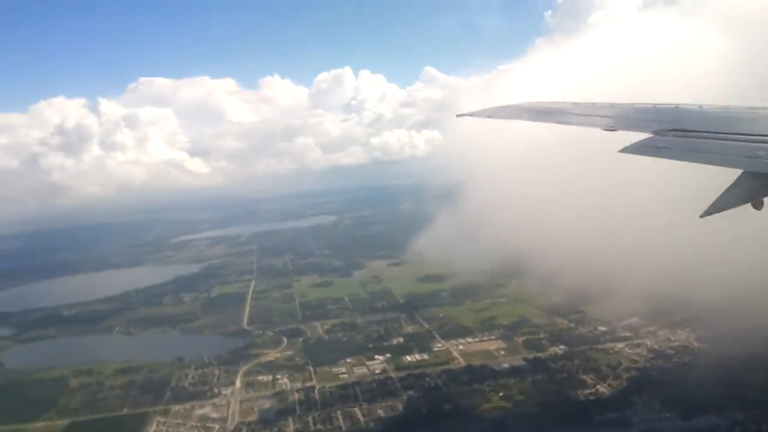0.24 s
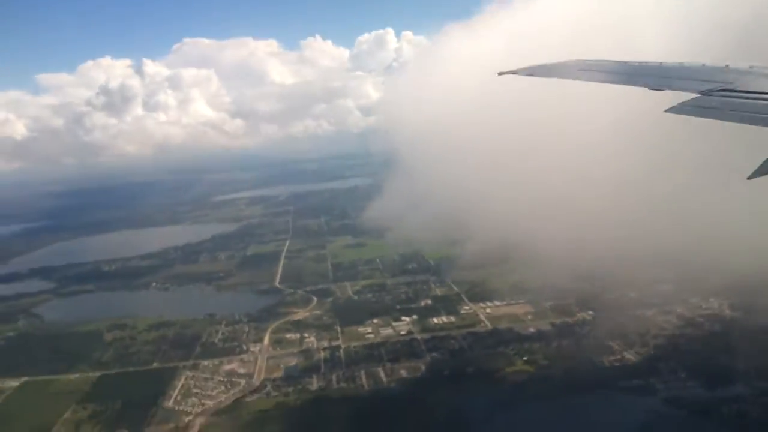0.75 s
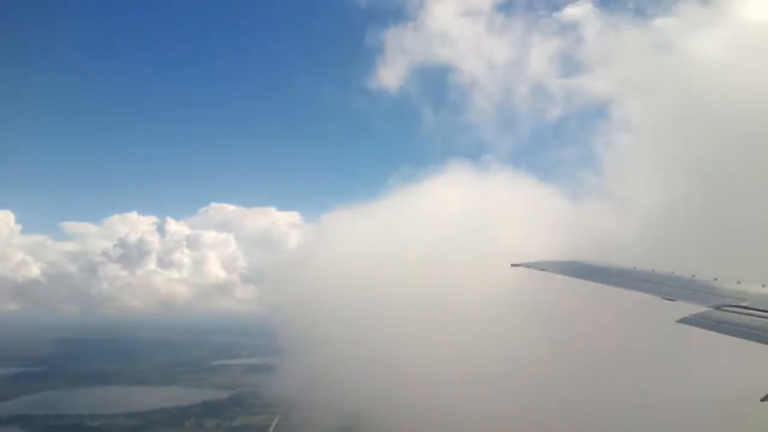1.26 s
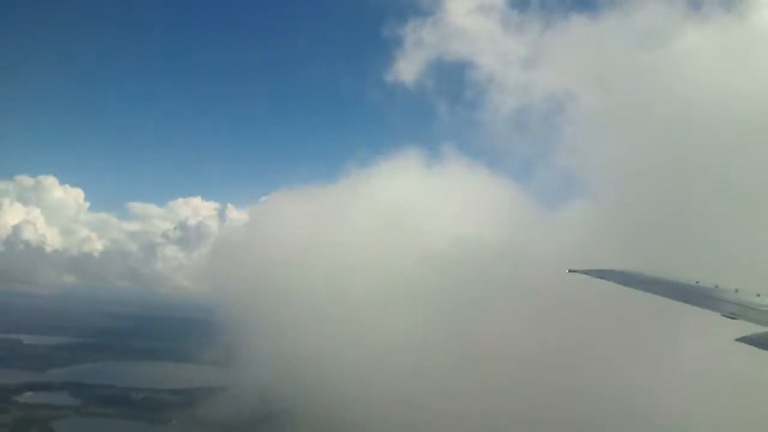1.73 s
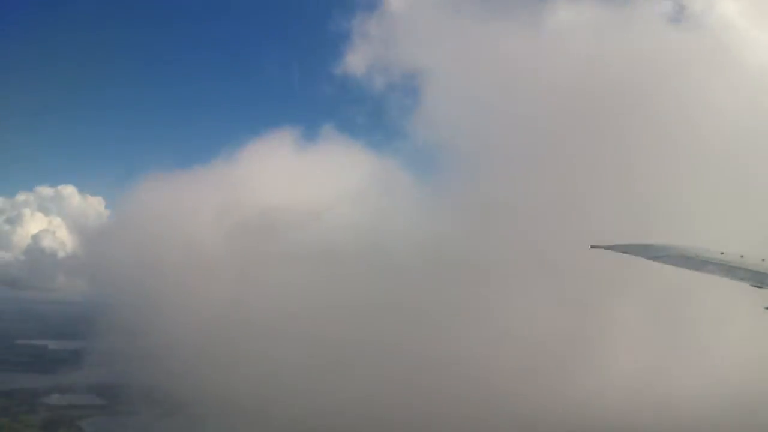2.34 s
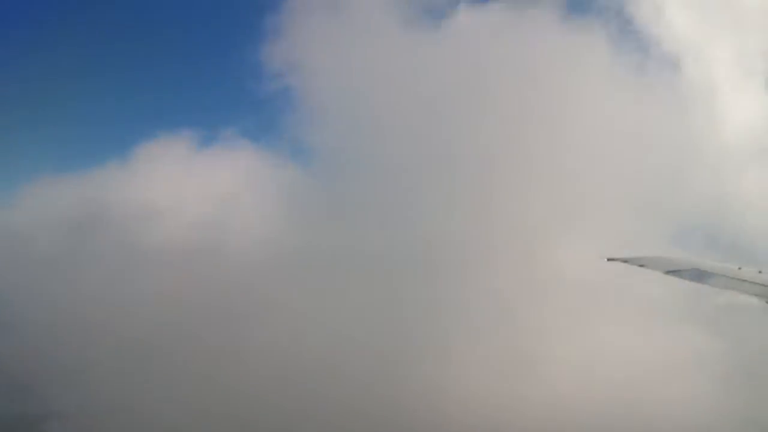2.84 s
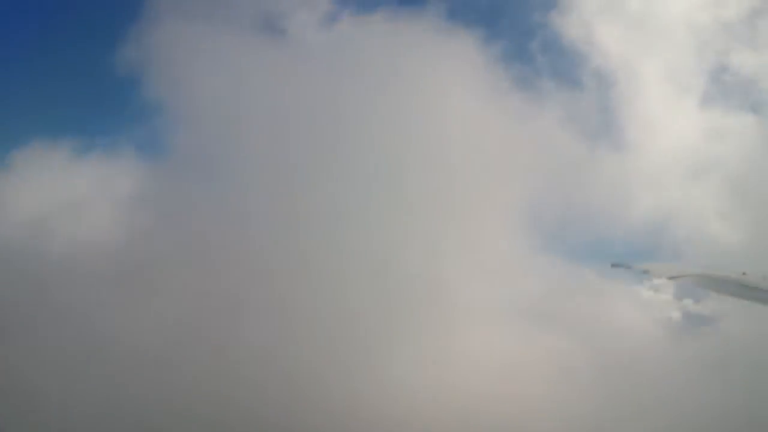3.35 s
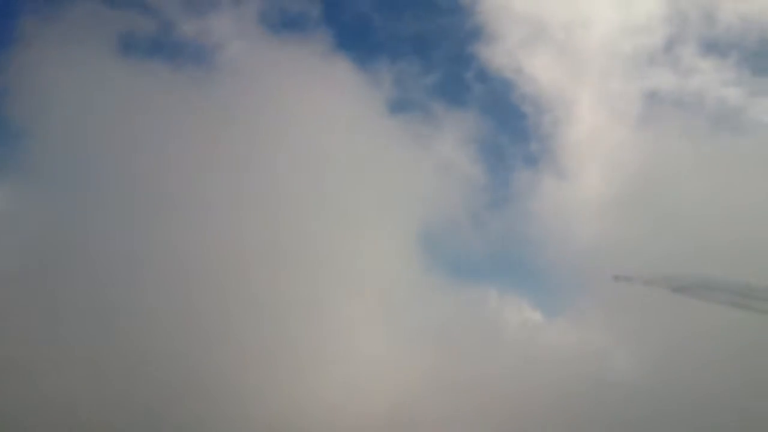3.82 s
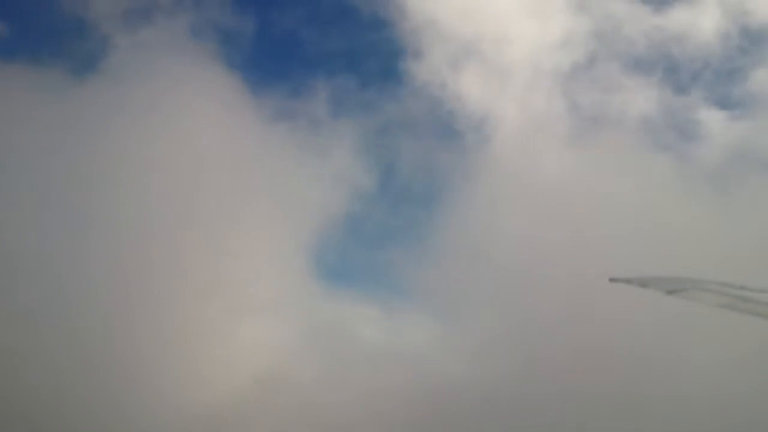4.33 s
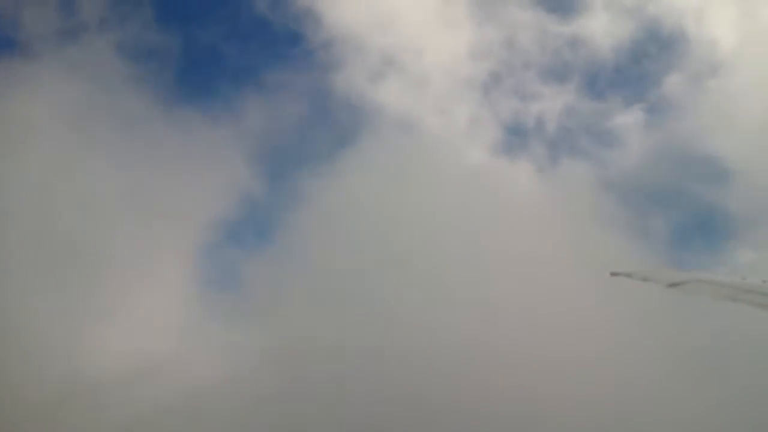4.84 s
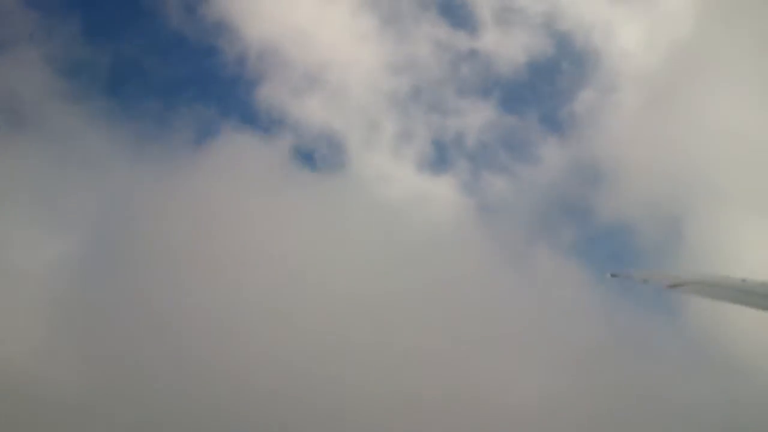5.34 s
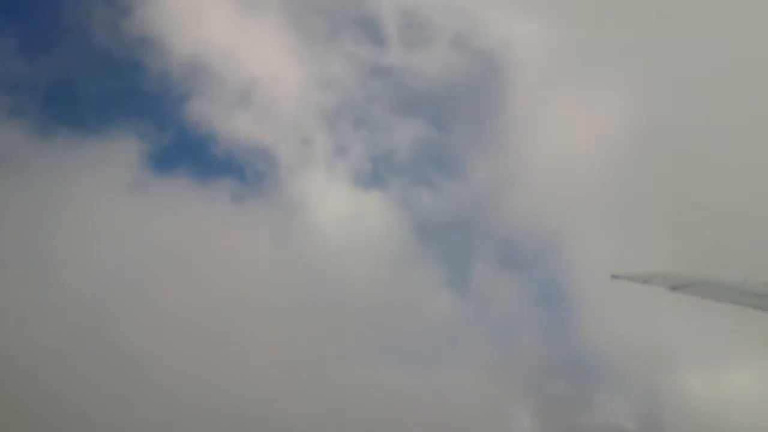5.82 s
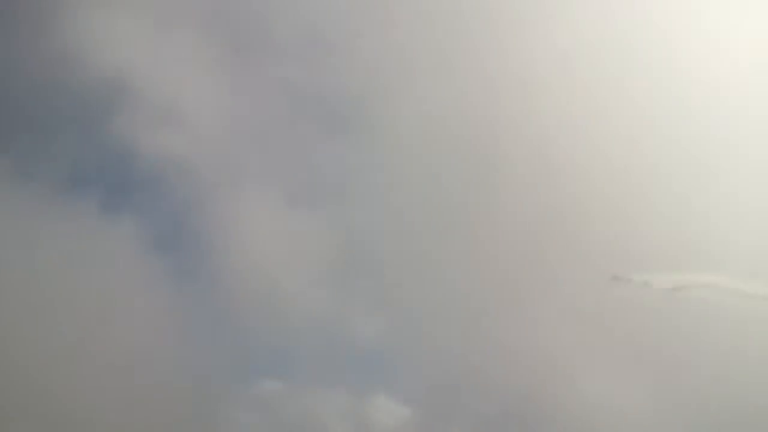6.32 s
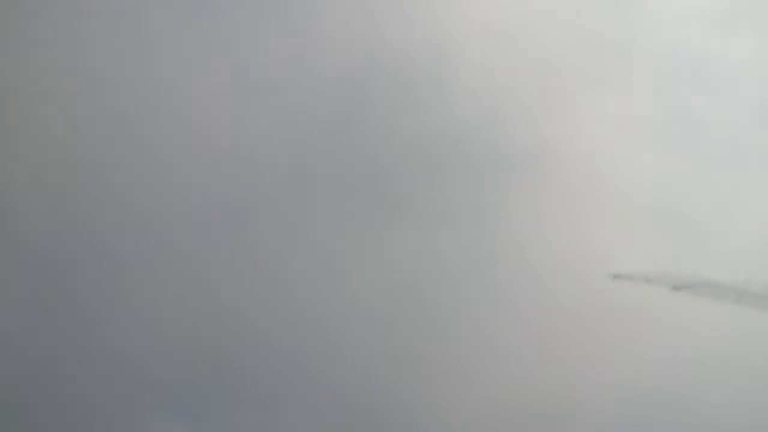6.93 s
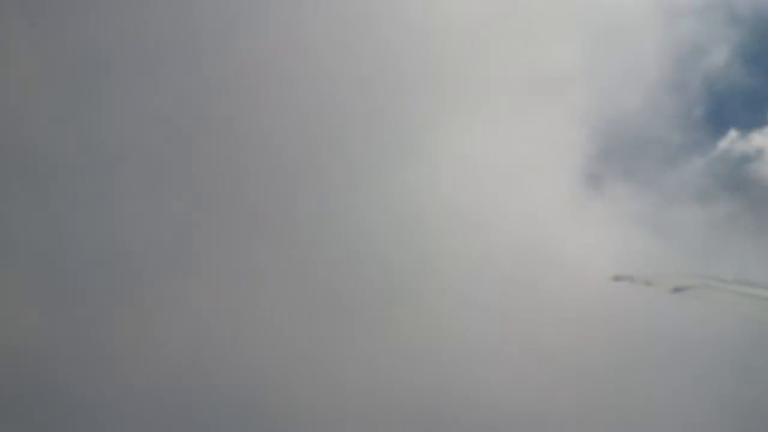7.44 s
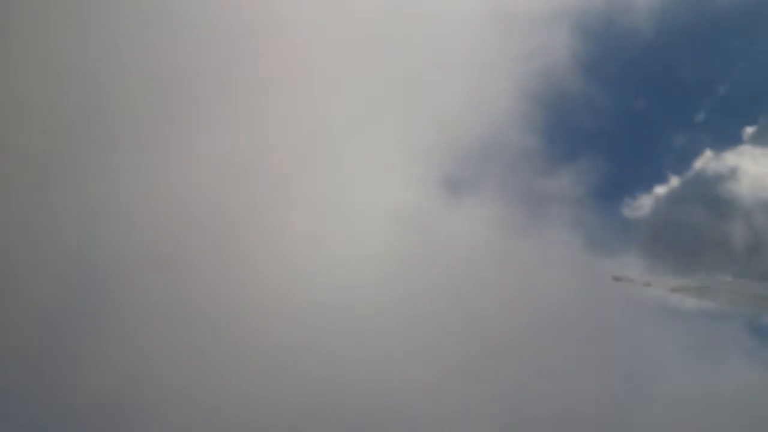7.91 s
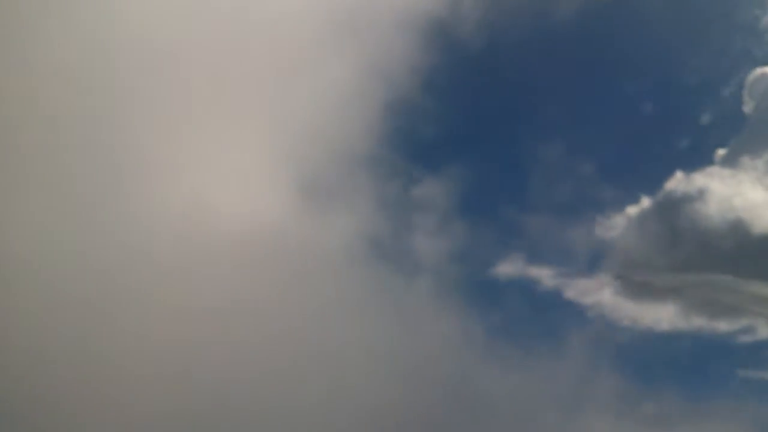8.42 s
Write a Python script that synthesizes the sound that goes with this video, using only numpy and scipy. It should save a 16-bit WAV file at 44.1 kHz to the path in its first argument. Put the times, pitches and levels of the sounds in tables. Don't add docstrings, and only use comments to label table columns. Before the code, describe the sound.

A handheld camera's small, narrow-band microphone close to a plane window picks up continuous low rumble, muffled roar and hiss. Soon a deep, nearly pure engine hum takes over, flattened and buzzing with overload. One violent bump with crackling clicks breaks in, then soft knocks, a sliding thumb and plastic ticks. The hiss turns more hollow and resonant; the hum throbs unevenly, and two late knocks follow.

```python
import sys
import numpy as np
from scipy import signal
from scipy.fft import rfft, irfft
from scipy.io import wavfile
from scipy.ndimage import uniform_filter1d

SR = 44100
rng = np.random.default_rng(int(sys.argv[2]) if len(sys.argv) > 2 else 0)


def volts(x):
    e = np.asarray(x, float) / 20
    return 10 ** e


def transcribe(signal):
    frames = np.atleast_2d(signal).T
    limited = np.clip(frames, -1, 1)
    pcm = np.round(limited * 32767).astype(np.int16)
    wavfile.write(sys.argv[1], SR, pcm)


N = 382347
CEILING, OFFSET = .709, -.07


def evened(x):
    return x / np.sqrt(np.mean(x ** 2) + 1e-20)


def read(points, hz):
    f, value = np.transpose(points)
    octaves_above = np.maximum(np.log2((hz + 1) / f[-1]), 0)
    return np.interp(np.log(hz + 1), np.log(f + 1), value) - 24 * octaves_above


def curve(rows, t, axis=1):
    rows = np.array(rows)
    return np.interp(t, rows[:, 0], rows[:, axis])


def add(mix, s, sound):
    part = mix[round(s * SR):][:len(sound)]
    part += sound[:len(part)]


def noise(colour_db, patchy_db, size):
    hop = size // 4
    frames, hz = N // hop + 5, np.fft.rfftfreq(size, 1 / SR)[:, None]
    a, b, patches = rng.standard_normal((frames, len(hz), 3)).T
    for axis in (0, 1):
        patches = uniform_filter1d(patches, size=9, axis=axis)
    level_db = colour_db(hz, np.arange(frames) * hop / SR) + patchy_db * evened(patches)
    z = (a + 1j * b) * volts(level_db)
    return evened(signal.istft(z, nperseg=size, noverlap=size - hop)[1][:N])


# time in seconds, level in dB.
BOOM = [(0, -16), (.3, -25), (.68, -23), (.87, -8.5), (1.9, -7.5), (2.2, -4.5), (3.2, -8.5), (4.5, -5),
        (5.4, -14), (6.9, -8.5), (7.2, -13.5), (7.55, -8), (7.72, -15), (7.85, -9), (8.67, -14.5)]
# time in seconds, level in dB.
SPOOL = [(0.0, -22.5), (3.5, -33.5), (3.96, -13), (4.42, -37), (4.61, -19.5), (6.59, -28), (7.75, -21),
         (8.04, -41), (8.67, -14.5)]


def boom(t):
    waver = rng.standard_normal(N)
    for _ in range(2):
        waver = uniform_filter1d(waver, size=2000)
    waver = evened(waver)
    slow_hz = 44.71 - .38 * t + 0.519 * waver
    fast_hz = 101.65 + 1.2 * waver[::-1]
    slow = volts(curve(BOOM, t)) * np.sin(2 * np.pi * np.cumsum(slow_hz) / SR)
    fast = volts(curve(SPOOL, t) - 5.0) * np.sin(2 * np.pi * np.cumsum(fast_hz) / SR)
    return np.sqrt(2) * (slow + fast)


def coupling_db(t):
    level_db = curve(BOOM, t)
    return level_db - level_db.mean()


# start in seconds, peak in dB, centre in Hz,
# spread in octaves, time to fade by 60 dB in seconds.
TICKS = [(0.139, -19.5, 5800, 0.98, 0.018), (.2552, -22.5, 5760, 0.4, 0.054), (1.087, -31, 5000, .6, 0.018),
         (2.5716, -12.5, 5400, 0.93, 0.0075), (2.589, -6, 6100, 2.5, 0.018), (2.5915, -15, 740, 0.75, 0.12),
         (2.6045, -17, 5960, 0.88, 0.016), (2.6195, -9.5, 7200, 1.3, 0.0078),
         (2.7668, -19, 7000, 0.59, 0.0091), (2.9527, -16, 1110, 1.1, 0.045),
         (3.601, -24.5, 7000, .6, 0.018), (3.7195, -21, 6500, 1.1, 0.024), (3.7325, -16, 6500, 1.3, 0.014),
         (3.945, -19.5, 6000, 1.2, 0.02), (4.126, -24, 5560, .7, 0.014), (4.311, -18, 6550, 1.9, 0.016),
         (4.8093, -17.5, 4500, 2.3, 0.024), (5.2608, -16, 5000, 2.1, 0.03),
         (5.385, -28.5, 7000, 0.28, .025), (5.7934, -9, 4770, 1.2, 0.025), (5.7963, -14, 890, 1.6, 0.03)]
# pitch in Hz, level in dB, time to fade by 60 dB in seconds.
HOUSING = [(750, -2, .010), (1500, -5, .006), (2300, -1, .007), (2800, 1, .007), (4200, 0, .006),
           (5000, 1, .006), (6100, -2, .005), (6850, -2, .005), (7650, 1, .005)]


def ticks():
    bare = 2.0
    out, u = np.zeros(N), np.arange(2000) / SR
    draws = rng.standard_normal((len(TICKS), len(u)))
    hz = np.fft.rfftfreq(len(u), 1 / SR) + 1
    ring = sum(volts(g - 60 * u / d) * np.sin(2 * np.pi * f * u) for f, g, d in HOUSING)
    for (s, db, centre_hz, spread, t60), draw in zip(TICKS, draws):
        colour_db = -6 * (np.log2(hz / centre_hz) / spread) ** 2
        crackle = irfft(rfft(draw) * volts(colour_db), len(u))
        crackle *= volts(-60 * u / t60)
        tick = evened(np.convolve(crackle, ring)[:len(u)]) + bare * evened(crackle)
        add(out, s, volts(db) * tick / abs(tick).max())
    return out


def grip():
    touch = np.zeros(N)
    for s, *_ in TICKS:
        add(touch, s - .007, np.hanning(800))
    return 1 - .25 * np.minimum(touch, 1)


# time in seconds, signed height (1 = full scale), fall in ms, rise in ms.
BLOW = [
    (2.5859, -1.5, 3, .03),
    (2.5866, 2.3, 3, .03),
    (2.5900, -.8, .5, .05),
    (2.5910, .7, 1.2, .1),
]
# time in seconds, height (1 = full scale), fall in ms, rise in ms.
KNOCKS = [
    (2.9018, .55, .6, .002),
    (2.9758, 1.6, .5, .18),
    (5.2100, .15, .6, .15),
    (5.7940, .6, .12, .005),
    (8.3413, .8, .5, .04),
    (8.3748, .65, 2.5, .012),
]


def knocks(capsule):
    out, ms = np.zeros(N), np.arange(1500) / SR * 1000
    lone = [(s, -np.sign(capsule[round(s * SR)]) * height, *shape) for s, height, *shape in KNOCKS]
    for s, height, fall_ms, rise_ms in BLOW + lone:
        add(out, s, height * np.exp(-ms / fall_ms) * (1 - np.exp(-ms / rise_ms)))
    return out


# peak time in seconds, peak in dB, swell in seconds, fade in seconds.
RUBS = [
    (.385, -35.5, .07, 0.064),
    (2.941, -23.5, .035, 0.08),
    (4.82, -30.5, 0.038, 0.041),
]
# frequency in Hz, level in dB per Hz.
SLIDE = [(500, 0.5), (1200, -2.5), (2500, -10.5), (5000, -5), (7600, -1), (9000, -4.5)]
# time in seconds, pitch in Hz, level in dB.
SQUEAK = [
    (.843, 960, -48),
    (.858, 990, -33),
    (.884, 1040, -31),
    (.905, 1090, -50),
]


def rubs(t):
    grain = noise(lambda hz, s: read(SLIDE, hz), patchy_db=2.2, size=64)
    strokes = np.zeros(N)
    for s, db, swell, fade in RUBS:
        away = np.maximum((s - t) / swell, (t - s) / fade)
        strokes += volts(db - 20 * away)
    sounding = (t > SQUEAK[0][0]) * (t < SQUEAK[-1][0])
    tone = np.sin(2 * np.pi * np.cumsum(curve(SQUEAK, t)) / SR)
    squeak = tone * volts(curve(SQUEAK, t, axis=2)) * sounding
    return strokes * grain + np.sqrt(2) * squeak


# frequency in Hz, level in dB per Hz.
RUMBLE = [(15, -17), (28, -12.5), (60, -3), (76, -8.5), (94, -2), (109, 1.5), (125, 0), (170, -1.5),
          (210, -1), (260, -8), (310, -10), (400, -24.5), (600, -72.5)]
# frequency in Hz, level in dB per Hz.
ROAR = [(250, -14), (360, -1), (450, 4), (540, 6), (640, -1.5), (900, -9), (1200, -14), (1700, -22.5),
        (2300, -40.5), (4000, -59)]
# frequency in Hz, level in dB per Hz.
HULL = [(22, -19), (30, -10), (40, -2), (50, 4), (58, -3), (70, -28)]


def airflow(t):
    rumble = noise(lambda hz, s: read(RUMBLE, hz), patchy_db=0.78, size=4096)
    roar = noise(lambda hz, s: read(ROAR, hz), patchy_db=0.4, size=1024)
    hum = noise(lambda hz, s: read(HULL, hz), patchy_db=.5, size=8192)
    contact_s, settle_s, loose_db = .78, .1, -7
    hum_db = -15 + loose_db * np.clip((contact_s - t) / settle_s, 0, 1)
    rumble_db = -11.5 - 0.05 * coupling_db(t)
    return volts(rumble_db) * rumble + volts(-28.5) * roar + volts(hum_db) * hum


# frequency in Hz, level in dB.
HISS = [(900, -14), (1600, 1.5), (2070, 4), (2350, 1.5), (2700, 0), (3300, .5), (3700, -3), (5200, -3.5),
        (6200, -1.5), (7050, 2.5), (7600, 1), (8100, 1), (10000, -2)]
# frequency in Hz, level in dB.
GAP = [(900, -14), (1600, .5), (2150, -1.5), (2600, -.5), (2850, 3.5), (3250, 2), (3550, -.5), (3900, -.3),
       (4170, 3), (4420, -1), (5350, -4.5), (6700, .3), (7400, .3), (8000, -2.5)]
# time in seconds, closure from 0 to 1.
CLOSED = [
    (0, 0),
    (1.3, .05),
    (2, .5),
    (4.7, .6),
    (4.85, 1),
    (8.67, 1),
]


def vents(t):
    def colour_db(hz, s):
        open_db = read(HISS, hz)
        return open_db + (read(GAP, hz) - open_db) * curve(CLOSED, s)

    hiss_db = -39.5 - 0.028 * coupling_db(t)
    return volts(hiss_db) * noise(colour_db, patchy_db=1.0, size=512)


def band_limited(x, edge_hz=8450):
    taps = signal.firwin(numtaps=121, cutoff=edge_hz, window=("kaiser", 7.5), fs=SR)
    return signal.oaconvolve(np.pad(x, len(taps) // 2, "edge"), taps, "valid")


def scene():
    t = np.arange(N) / SR
    air = boom(t) + airflow(t) + vents(t) + rubs(t) + OFFSET
    capsule = grip() * np.clip(band_limited(air), -CEILING, CEILING)
    steps = knocks(capsule)
    touches = band_limited(ticks() + .4 * steps) + .6 * steps
    return (capsule + touches)[None]


def band_limit(x):
    return signal.sosfilt(signal.butter(12, 15900, fs=SR, output="sos"), x)


def record(dry):
    clipped = np.clip(dry[0], -CEILING, CEILING)
    narrow = band_limited(clipped, edge_hz=8050)
    spill = volts(-8.0) * (clipped - narrow)
    heard = narrow + spill
    return band_limit(heard[None])


dry = scene()
out = record(dry)
transcribe(out)
```